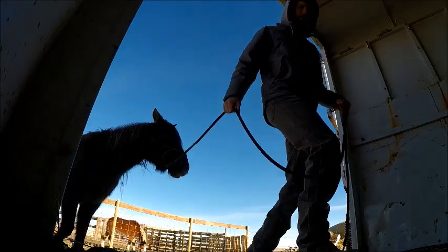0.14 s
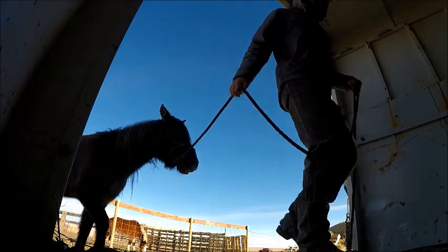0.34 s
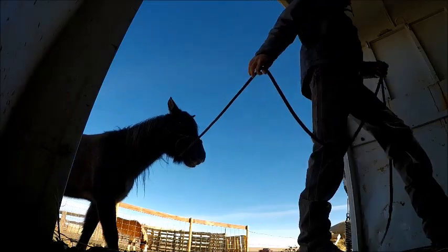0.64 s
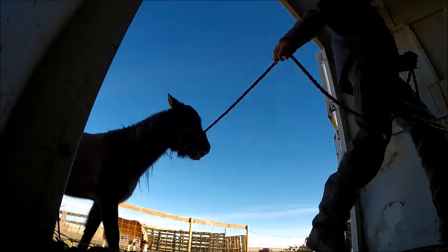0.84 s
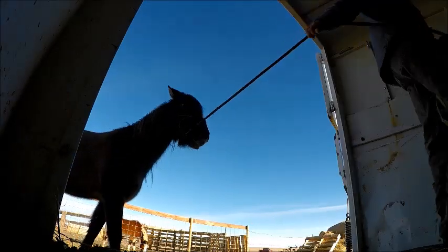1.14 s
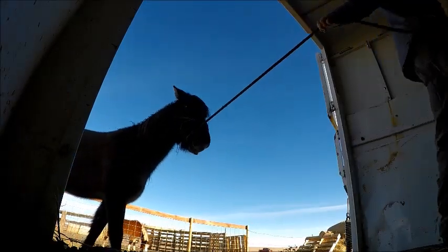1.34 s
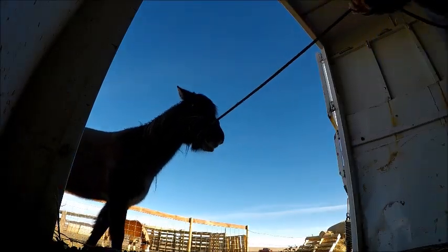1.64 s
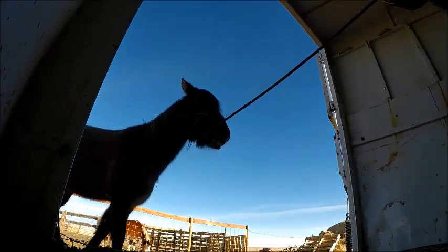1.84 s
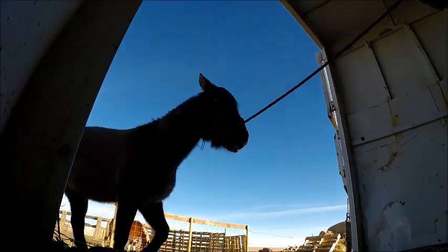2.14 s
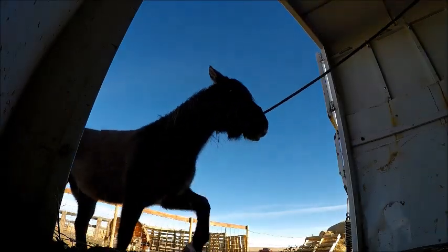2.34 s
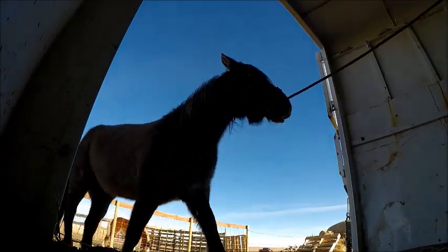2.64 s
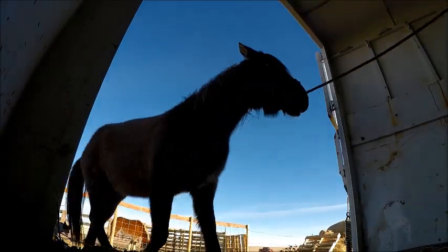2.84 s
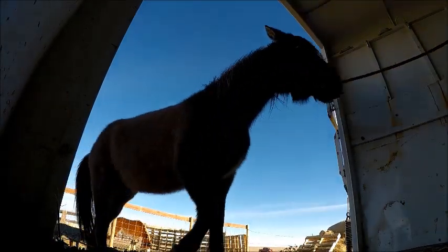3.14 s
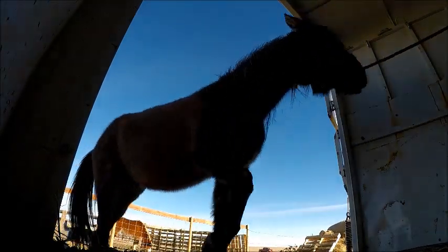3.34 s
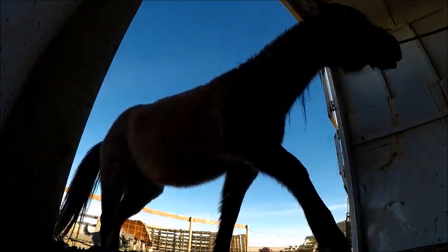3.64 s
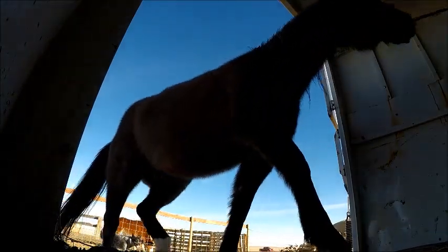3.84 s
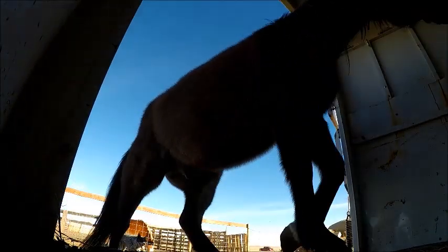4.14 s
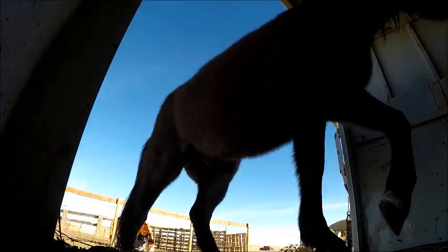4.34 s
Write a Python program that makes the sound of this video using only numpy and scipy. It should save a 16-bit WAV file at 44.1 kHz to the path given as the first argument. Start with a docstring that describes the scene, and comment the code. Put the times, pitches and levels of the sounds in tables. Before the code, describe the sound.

Boots and hooves knock and scrape on trailer planks, then full weight lands in deep, rattling thuds while wind rumbles softly through the box.

```python
"""A horse is led up into a steel stock trailer, heard by two ports near the floor, the right one closer to it.
Boots and hooves first knock the planks lightly, as ringing modes with wall rattle, ticks and scuffing grit.
Short stick-slip squeaks follow; near 2.6 s full weight lands, the chassis booms and the longest squeak begins.
From then on the chassis modes keep swaying under further heavy blows, the last at 4.4 s.
Throughout, wind in the open box is shaped noise: a low rumble, a hum and a thin hiss."""
import sys
import numpy as np
from scipy import signal
from scipy.fft import rfft, irfft, next_fast_len
from scipy.io import wavfile

SR = 44100
rng = np.random.default_rng(int(sys.argv[2]) if len(sys.argv) > 2 else 0)


def dump_mix(stems):
    """Bounce the given channels to the path in sys.argv[1] as a 16-bit WAV at rate SR."""
    frames = np.atleast_2d(stems).T  # one column per channel
    limited = np.clip(frames, -1, 1)  # hard clip at full scale
    pcm = np.round(limited * 32767).astype(np.int16)
    wavfile.write(sys.argv[1], SR, pcm)


N = 198047
T = np.arange(N) / SR

# blows on the floor, before trim: (time [s], thump level [dB], knock level [dB], rap level [dB],
# clack level [dB], first contact level [dB])
BLOWS = [(0.055, -40, -25, -53, -46, -62), (0.09, -29.5, -57, -42, -31, -36),
         (0.103, -52, -30, -41, -38, -29), (0.115, -42, -28.5, -41, -48, -31.5),
         (0.566, -47, -47, -70, -65, -54), (0.836, -34.5, -45, -64, -54, -77),
         (0.972, -43.5, -48.5, -51, -47, -52), (1.56, -30.5, -41, -48, -68, -70),
         (1.609, -44, -42, -54, -59, -49), (1.72, -40, -49.5, -56, -60, -54),
         (2.463, -63, -49, -64, -43, -57), (2.645, -16.5, -16, -22.5, -25.5, -41),
         (3.12, -34, -44, -56, -58, -61), (3.659, -53, -45, -53, -69, -70),
         (3.75, -22.5, -22, -32.5, -38, -43), (4.151, -34, -32.5, -27.5, -39.5, -31),
         (4.156, -15.5, -30.5, -40, -49, -59), (4.355, -36.5, -74, -66, -83, -79)]
# pitches of thump, knock, rap, clack: [Hz]
BLOW_HZ = [120, 460, 700, 1600]


def blow_level_db(levels_db, hz):
    """Level of one blow at a pitch, read between its four levels."""
    return at_hz(np.transpose([BLOW_HZ, levels_db]), hz)


# plank modes: (frequency [Hz], level against the blow before trim [dB], t60 [s])
FLOOR_MODES = [(101.2, 1, 0.57), (126.8, 14, 0.13), (151, -0.5, 0.44), (182.3, -0.5, 0.59),
               (195, -11.5, 0.16), (247.6, -0.5, 0.44), (280.5, 0.5, 0.3), (296.4, -0.5, 0.13),
               (393.8, -1, 0.18), (483, 6.5, 0.05), (527.5, -26.5, 0.16), (595.5, 0, 0.14),
               (717, -15.5, 0.3), (828, -16, 0.22), (1008, -0.5, 0.34), (1163, 16, 0.024),
               (1387, 11.5, 0.031), (1744, -1.5, 0.07), (1960, -10.5, 0.16)]
# hard edge of hoof or heel: (frequency [Hz], level against first contact before trim [dB], t60 [s])
CONTACT_MODES = [(1084, 11.5, 0.015), (1610, 3.5, 0.016), (1966, -7, 0.061), (2880, -12.5, 0.0097)]


def floor_rings():
    """Each blow rings the plank modes, which take about a cycle to build up, and clacks at first contact."""
    out = np.zeros(N + SR)
    t = np.arange(SR) / SR
    rings = [swell(t, 1.15 / hz, t60) * np.sin(2 * np.pi * hz * t) for hz, _, t60 in FLOOR_MODES]
    clack = sum(amp(db - 60 * t / t60) * np.sin(2 * np.pi * hz * t) for hz, db, t60 in CONTACT_MODES)
    spots = rng.standard_normal((len(BLOWS), len(FLOOR_MODES)))  # every blow lands on another spot
    for (start_s, *levels_db, contact_db), spot in zip(BLOWS, spots):
        i = round(start_s * SR)
        for (hz, mode_db, _), ring, chance in zip(FLOOR_MODES, rings, spot):
            ring_db = blow_level_db(levels_db, hz) + mode_db - 5.5 + 0.57 * chance
            out[i:i + SR] += amp(ring_db) * ring
        out[i:i + SR] += amp(contact_db - 4.0) * clack
    return out[:N]


# dense wall rattle: (frequency [Hz], level against the blow before trim [dB], t60 [s])
PANELS = [(158, -2, 0.5), (322, -3, 0.38), (550, -1.5, 0.28), (1200, -2.5, 0.3), (2360, -21, 0.44),
          (4900, -44.5, 1), (9000, -54, 0.074)]


def panels():
    """Each blow shakes the wall panels into noise that dies band by band."""
    out = np.zeros(N)
    t = np.arange(SR) / SR
    edges_hz = 120 * 2 ** np.arange(0, 6.6, .5)
    white = rng.standard_normal((2, N))  # alternated so that neighbouring bands differ
    for k, (low_hz, high_hz) in enumerate(zip(edges_hz, edges_hz[1:])):
        hz = np.sqrt(low_hz * high_hz)
        shake = np.zeros(N + SR)
        tail = swell(t, 0.14 / hz, at_hz(PANELS, hz, axis=2))
        for start_s, *levels_db, _ in BLOWS:
            shake_db = blow_level_db(levels_db, hz) + at_hz(PANELS, hz) - 4.5
            shake[round(start_s * SR):][:SR] += amp(shake_db) * tail
        out += shake[:N] * rms_one(band(white[k % 2], low_hz, high_hz))
    return out


# weight coming down: (time [s], low mode level [dB], upper mode level [dB], rise [s])
BOOMS = [(0.055, -34, -21.5, 0.022), (0.83, -21, -22, 0.09), (0.98, -40, -51, .02),
         (1.551, -24.5, -29, 0.042), (1.72, -52, -35, 0.061), (2.647, -13, -23, 0.035),
         (3.751, -13, -20.5, 0.013), (4.029, -43, -38, 0.032), (4.151, -16.5, -17.5, 0.025),
         (4.209, -30, -37, 0.025), (4.36, -22.5, -34, 0.056)]
# sway of the frame: (time [s], low mode level [dB], upper mode level [dB])
SWAY = [(0, -65.5, -69), (1.1, -56, -62), (2.0, -50.5, -58), (2.62, -69.5, -55.5), (2.9, -35.5, -33.5),
        (3.12, -35, -33.5), (3.35, -41, -36), (3.7, -48, -36), (3.9, -50, -36.5), (4.08, -33.5, -33),
        (4.3, -52, -45.5), (4.49, -44, -35)]
# chassis modes: (frequency [Hz], pitch wander [share], boom t60 [s], sway throb [dB])
SWAY_MODES = [(48, 0.0857, 0.48, 5.5), (76.1, 0.0452, 0.19, -1)]


def chassis():
    """The two lowest chassis modes, unsteady in pitch: booms that die away over a throbbing sway."""
    out = 0
    times_s, *levels_db = np.transpose(SWAY)
    for k, (hz, wander, t60, throb_db) in enumerate(SWAY_MODES):
        phase = 2 * np.pi * np.cumsum(hz * (1 + wander * drift(9.0))) / SR
        booms = sum(amp(boom_db[k]) * swell(np.maximum(T - start_s, 0), rise_s, t60)
                    for start_s, *boom_db, rise_s in BOOMS)
        booms = booms * amp(3.6 * drift(4))
        sway = amp(np.interp(T, times_s, levels_db[k]) + throb_db * drift(7.9))
        out = out + (booms + sway) * np.sqrt(2) * np.sin(phase)
    return out


SAG_S = .07  # the pitch sags over the last SAG_S
STEADY_JITTER_HZ, JITTER_PER_SAG = 5.8, .3
CATCH_HZ, CATCH_S = 59.5, 0.0295  # starts this much sharp, settles with this time constant
# joints: (start [s], length [s], pitch [Hz], sag at the end [Hz], tone level [dB], octave level [dB])
SQUEAKS = [(0.993, 0.041, 4650, 20, -61, -90), (1.53, 0.11, 4280, 56, -67.5, -90),
           (2.012, .105, 4730, 800, -62, -80), (2.372, 0.077, 4010, 80, -74, -82),
           (2.474, 0.041, 3530, 49, -58, -63.5), (2.6, 0.043, 6200, 9, -69, -99),
           (2.702, 0.45, 3742, 203, -62, -70)]
# swells of the longest squeak, added to its levels: (time [s], tone level [dB], octave level [dB])
SQUEAK_SWELL = [(2.7, 0, -5), (2.75, -1, -4), (2.8, 4.5, -6), (2.95, -5.5, 5), (3.05, 5, -12),
                (3.09, 1.5, 6), (3.15, 4, -8), (3.18, -8, -15)]


def squeaks():
    """Stick-slip in a metal joint: a tone and its octave, sagging and turning rough as the slip runs out."""
    out = np.zeros(N)
    times_s, *swells_db = np.transpose(SQUEAK_SWELL)
    tone_swell_db, octave_swell_db = (np.interp(T, times_s, s, left=0) for s in swells_db)
    for start_s, length_s, pitch_hz, end_sag_hz, tone_db, octave_db in SQUEAKS:
        end_s = start_s + length_s
        sag_hz = end_sag_hz * np.clip(1 + (T - end_s) / SAG_S, 0, 1)
        catch_hz = CATCH_HZ * np.exp(-np.maximum(T - start_s, 0) / CATCH_S)
        jitter_hz = (STEADY_JITTER_HZ + JITTER_PER_SAG * sag_hz) * drift(180)
        phase = 2 * np.pi * np.cumsum(pitch_hz + catch_hz - sag_hz + jitter_hz) / SR
        gate = np.clip(np.minimum(T - start_s, end_s - T) / 0.0057, 0, 1)  # 5.7 ms fades
        gate = gate * amp(2.0 * drift(51)) * np.sqrt(2)
        tone = amp(tone_db + tone_swell_db) * np.sin(phase)
        octave = amp(octave_db + octave_swell_db) * np.sin(2 * phase)
        out += gate * (tone + octave)
    return out


# grit dragged under hoof and boot: (time [s], level before trim [dB], centre [Hz], t60 [s])
SCUFFS = [(0.0283, -49, 4700, 0.36), (0.1072, -38, 2800, 0.17), (0.5113, -33, 2290, 0.17),
          (0.535, -44.5, 1900, 0.16), (0.9525, -47, 2620, 0.31), (1.257, -43.5, 6700, 0.058),
          (1.6176, -59, 3330, 0.087), (1.7006, -48, 6190, 0.12), (2.0283, -53, 4600, 0.38),
          (2.664, -45.5, 2500, 0.31), (2.7144, -50, 3100, 0.1), (2.734, -46.5, 3200, 0.27),
          (2.835, -43.5, 3280, 0.12), (2.9244, -49.5, 3570, 0.16), (2.9614, -54, 3740, 0.12),
          (3.3256, -53, 5690, 0.22), (3.5524, -43, 5360, 0.081), (3.7539, -37, 2720, 0.26),
          (3.827, -34, 2630, 0.07), (3.849, -45, 2740, 0.41), (3.8786, -37, 2640, 0.081),
          (4.0338, -52, 2820, 0.081), (4.1544, -49.5, 3140, 0.3), (4.235, -49.5, 6200, 0.098),
          (4.2594, -48, 2740, 0.11)]
# thin sheet metal set clattering: (frequency [Hz], width [Hz], level before trim [dB])
CLATTER = [(2220, 620, 2), (2820, 1100, -2.5), (3400, 720, 2.5), (4220, 67, -2), (5250, 1300, -2),
           (6090, 1100, 6), (7300, 790, 1)]


def scuffs():
    """Dragged grit is a shower of noise grains, partly ringing in thin sheet metal."""
    grit = bursts(SCUFFS, spread=2.32, grains_per_s=6100.0, rise_s=0.0038, trim_db=-10.0)
    clatter = sum(amp(db - 1.5) * resonance(grit, hz, width_hz) for hz, width_hz, db in CLATTER)
    return amp(-6.5) * grit + clatter


# loose metal fittings: (time [s], level before trim [dB], centre [Hz], t60 [s])
TICKS = [(0.0658, -31.5, 6240, 0.019), (0.0933, -23, 1890, 0.012), (0.1036, -25, 4600, 0.0074),
         (0.1031, -43, 1940, 0.011), (0.5102, -34, 3650, 0.026), (1.0014, -42, 5000, 0.05),
         (1.005, -40, 2950, 0.03), (2.0043, -35.5, 6200, 0.019), (2.7164, -36, 3100, 0.025),
         (3.525, -38, 1880, 0.014), (3.7838, -24.5, 3050, 0.018), (3.9476, -44, 2270, 0.026)]


def ticks():
    """Loose fittings tick: short, narrow bursts of grains."""
    return bursts(TICKS, spread=1.29, grains_per_s=8200.0, rise_s=0.00068, trim_db=-6.0)


BOX_HZ, BOX_WIDTH_HZ, BOX_DB = 184.3, 17.3, -1  # hum, gain against the rumble
# wind, before trim: (time [s], rumble level [dB], hiss level [dB])
WIND = [(0.0, -39, -60.5), (0.3, -39, -54.5), (0.75, -42, -58), (1.07, -41, -58), (1.4, -43, -61.5),
        (1.66, -46, -55), (2.2, -42, -63), (2.53, -42, -53.5), (2.79, -35, -64), (3.2, -42.5, -59),
        (3.9, -38.5, -59), (4.1, -43.5, -65.5), (4.33, -56, -68), (4.49, -44.5, -60.5)]
# rumble spectrum: (frequency [Hz], relative density [dB per Hz])
RUMBLE = [(12, -30), (20, -4), (80, -13), (124, -3), (157, -8), (233, -13), (317, -17.5), (367, -13.5),
          (597, -37), (677, -23), (769, -28), (1500, -46), (1950, -55.5), (3300, -120)]
# hiss spectrum: (frequency [Hz], relative density [dB per Hz])
HISS = [(410, -43), (700, 9.5), (888, -7), (994, -6), (1130, 10.5), (1210, -12), (2190, -12), (3950, -15),
        (4310, -16.5), (7110, -11.5), (14000, -34.5)]


def wind():
    """Wind is a low noise rumble, which sets a box resonance humming, and a thin hiss."""
    times_s, rumble_db, hiss_db = np.transpose(WIND)
    rumble = amp(np.interp(T, times_s, rumble_db) - 4.0) * coloured(RUMBLE, patchy_db=0.5)
    hum = amp(BOX_DB) * resonance(rumble, BOX_HZ, BOX_WIDTH_HZ)
    hiss = amp(np.interp(T, times_s, hiss_db) + 1.0) * coloured(HISS, patchy_db=2.5)
    return rumble + hum + hiss


def diffuse():
    """The noisy sources, whose fine detail differs from place to place in the box."""
    return panels() + scuffs() + ticks() + wind()


# the two ports: (frequency [Hz], left lead [rad], left minus right [dB], power common to both [share])
PORTS = [(50, 0, -7.8, .93), (120, 0, -4.3, .92), (340, .15, -4.5, .8), (600, .8, -3, .55),
         (950, 2.6, 0, .75), (1350, 2.0, .4, .75), (1900, .6, -1.5, .45), (3500, 1.2, -1.8, .2),
         (6000, 1.5, -.5, .05), (13000, 1.5, -.6, .05)]


def ports(both, shared, left_only):
    """The left port hears the shared field turned in phase, mixed with a field of its own."""
    size = next_fast_len(N + SR // 4)
    hz = np.maximum(np.arange(size // 2 + 1) * SR / size, 1)
    lead_rad, balance_db, common = (at_hz(PORTS, hz, axis=k) for k in (1, 2, 3))
    common = np.clip(common, 0, 1)
    both, shared, left_only = rfft([both, shared, left_only], size)
    left = (both + np.sqrt(common) * shared) * np.exp(1j * lead_rad)
    left = left + np.sqrt(1 - common) * left_only
    right = both + shared
    return irfft([left * amp(balance_db / 2), right * amp(-balance_db / 2)], size)[:, :N]


def amp(db):
    """Decibels to gain."""
    return 10 ** (np.asarray(db) / 20)


def rms_one(x):
    """Scale to unit rms."""
    return x / np.sqrt(np.mean(x ** 2) + 1e-20)


def at_hz(points, hz, axis=1):
    """Read a column of a frequency table on a log axis."""
    points = np.array(points)
    return np.interp(np.log(hz), np.log(points[:, 0]), points[:, axis])


def drift(rate_hz):
    """Slow random wander of spread 1: noise through two equal poles, run at SR / 40."""
    r = np.exp(-2 * np.pi * rate_hz * 40 / SR)
    white = rng.standard_normal(N // 40 + 2002)
    slow = signal.lfilter([1], [1, -2 * r, r * r], white)[2000:]  # settled part
    return np.interp(np.arange(N) / 40, np.arange(len(slow)), rms_one(slow))


def band(x, low_hz, high_hz):
    """Band-pass."""
    edges_hz = [low_hz, min(high_hz, SR * .45)]
    return signal.sosfilt(signal.butter(2, edges_hz, "band", fs=SR, output="sos"), x)


def resonance(x, hz, width_hz):
    """Two-pole resonance with gain 1 on top."""
    r = np.exp(-np.pi * width_hz / SR)
    poles = [1, -2 * r * np.cos(2 * np.pi * hz / SR), r * r]
    return signal.lfilter([(1 - r * r) / 2, 0, (r * r - 1) / 2], poles, x + 1e-18)


def swell(t, rise_s, t60):
    """Builds up over rise_s, then dies away."""
    return (1 - np.exp(-t / max(rise_s, 1e-4))) * amp(-60 * t / max(t60, .005))


def bursts(events, spread, grains_per_s, rise_s, trim_db):
    """Showers of uneven grains around a centre pitch."""
    out = np.zeros(N + SR)
    t = np.arange(SR // 2) / SR
    for start_s, db, hz, t60 in events:
        sizes = rng.standard_normal(len(t)) * amp(3.5 * rng.standard_normal(len(t)))
        grains = sizes * (rng.random(len(t)) < grains_per_s / SR)
        burst = rms_one(band(grains, hz / spread, hz * spread)) * swell(t, rise_s, t60)
        out[round(start_s * SR):][:len(t)] += amp(db + trim_db) * burst
    return out[:N]


def coloured(spectrum, patchy_db):
    """Half-octave bands of noise, each flickering a little on its own; rms 1."""
    out = 0
    edges_hz = 22 * 2 ** np.arange(0, 9.6, .5)
    white = rng.standard_normal((2, N))
    for k, (low_hz, high_hz) in enumerate(zip(edges_hz, edges_hz[1:])):
        gain = amp(at_hz(spectrum, np.sqrt(low_hz * high_hz)) + patchy_db * drift(7.1))
        out = out + gain * band(white[k % 2], low_hz, high_hz)
    return rms_one(out)


def scene():
    """All sources through the two ports."""
    return ports(floor_rings() + squeaks() + chassis(), diffuse(), diffuse())


def record(dry):
    """Cuts the subsonics below 18 Hz and the top above 14.3 kHz."""
    x = signal.sosfilt(signal.butter(2, 18, "high", fs=SR, output="sos"), dry)
    return signal.sosfilt(signal.cheby2(12, 60, 14300, fs=SR, output="sos"), x)


dry = scene()
out = record(dry)
dump_mix(out)
```